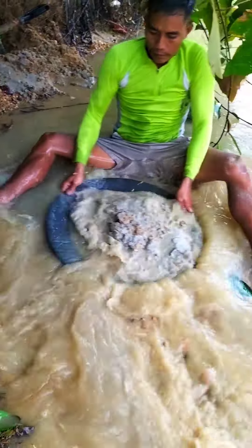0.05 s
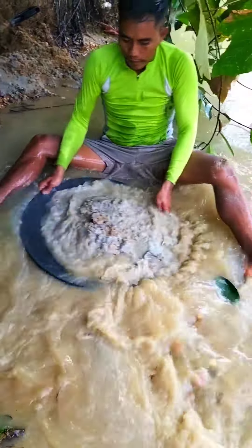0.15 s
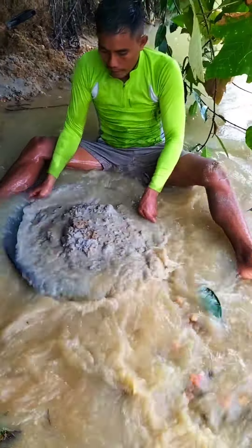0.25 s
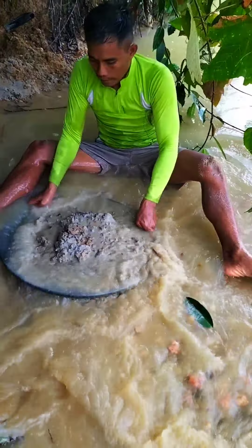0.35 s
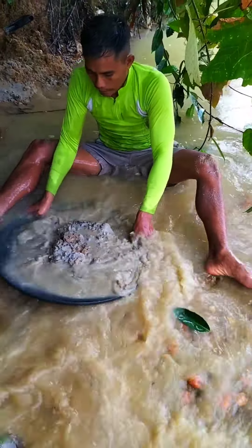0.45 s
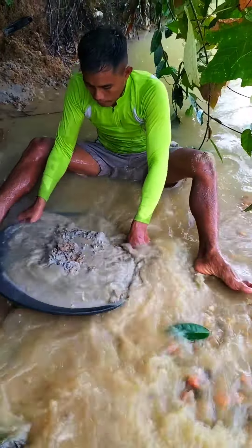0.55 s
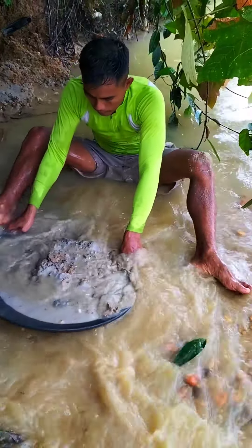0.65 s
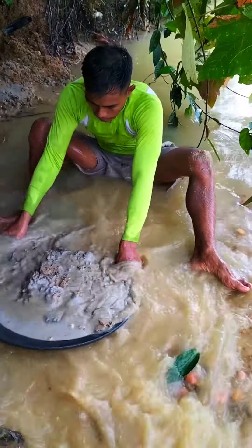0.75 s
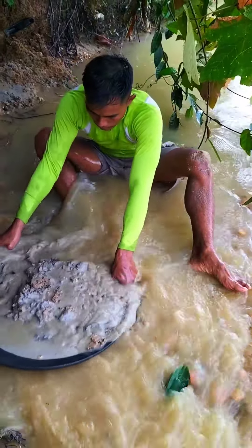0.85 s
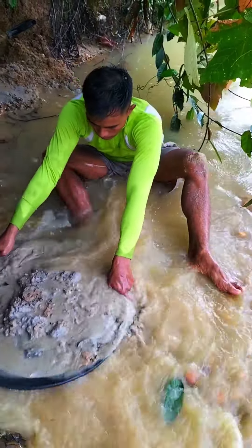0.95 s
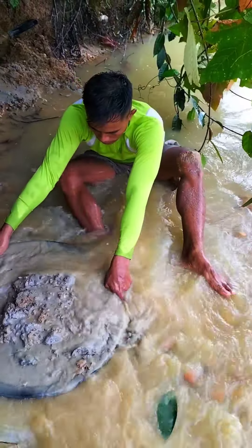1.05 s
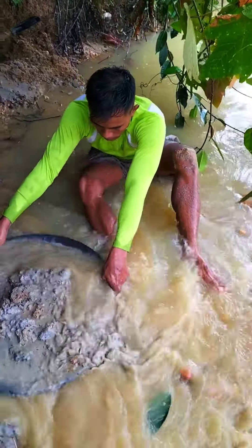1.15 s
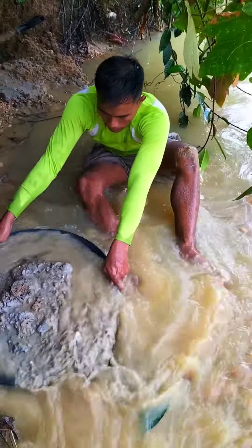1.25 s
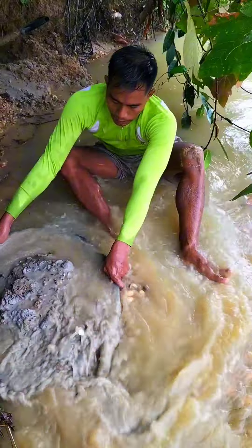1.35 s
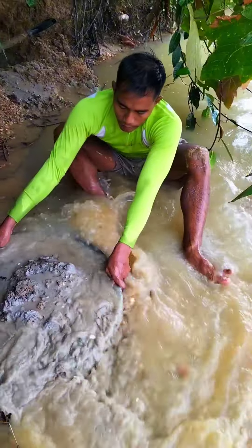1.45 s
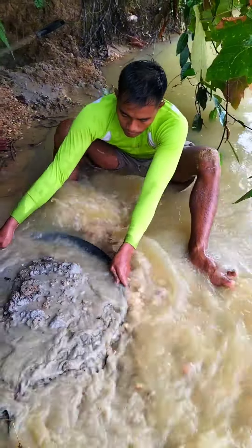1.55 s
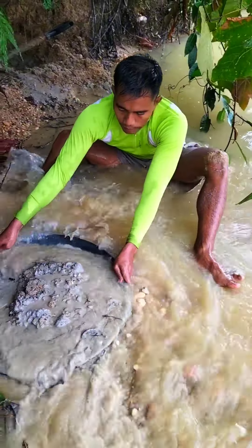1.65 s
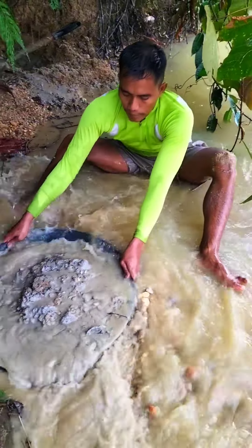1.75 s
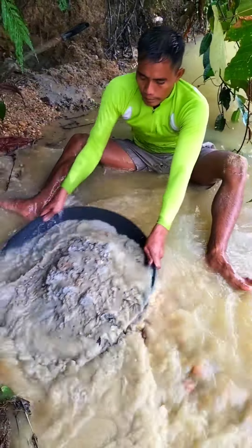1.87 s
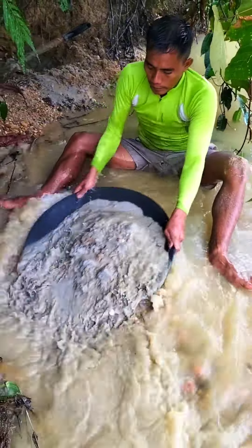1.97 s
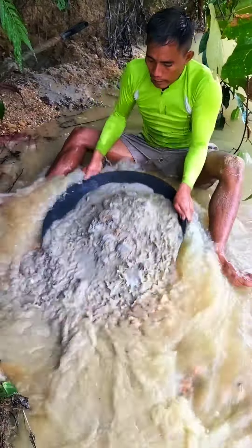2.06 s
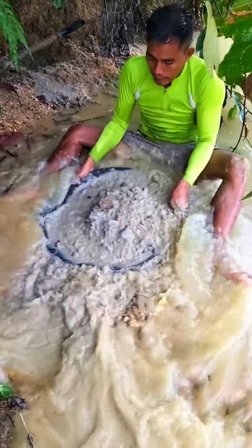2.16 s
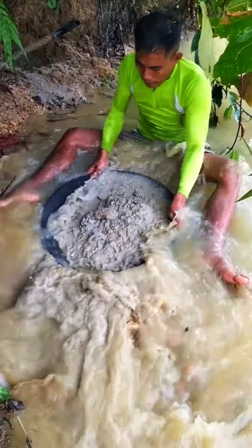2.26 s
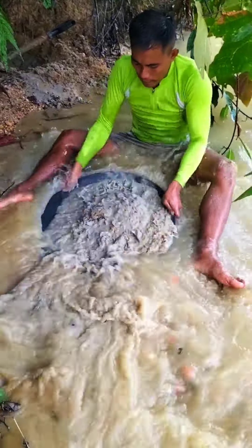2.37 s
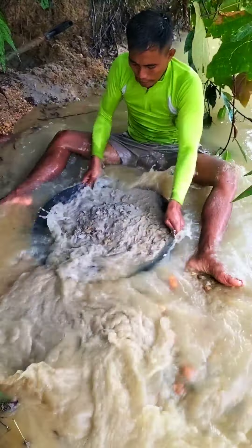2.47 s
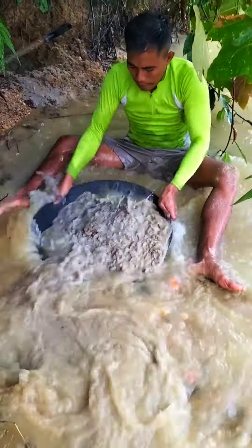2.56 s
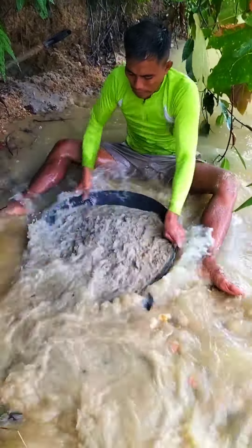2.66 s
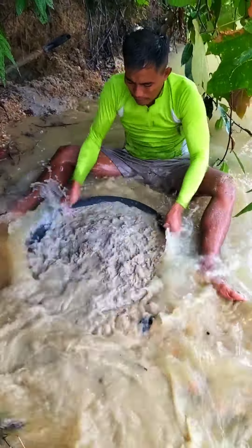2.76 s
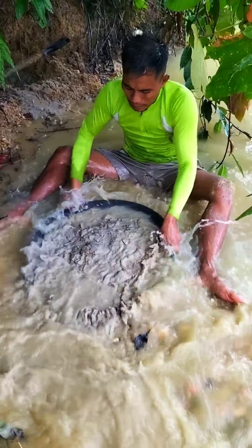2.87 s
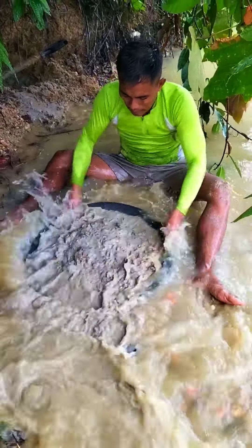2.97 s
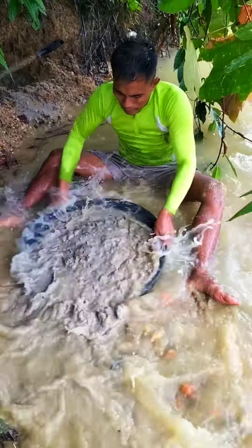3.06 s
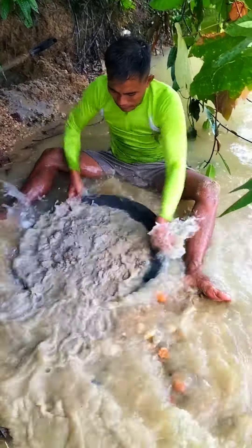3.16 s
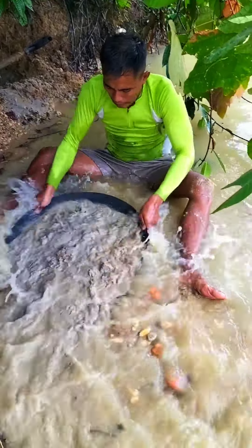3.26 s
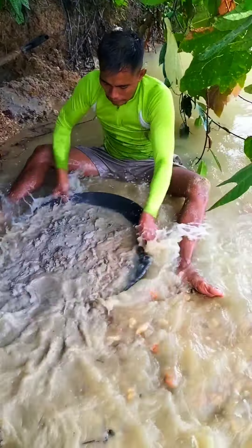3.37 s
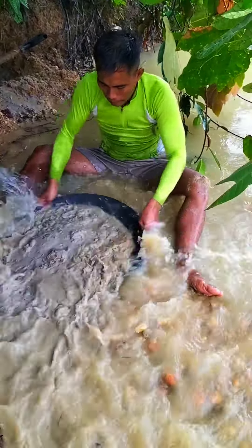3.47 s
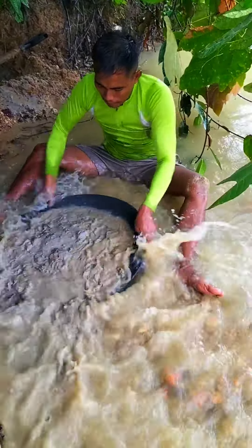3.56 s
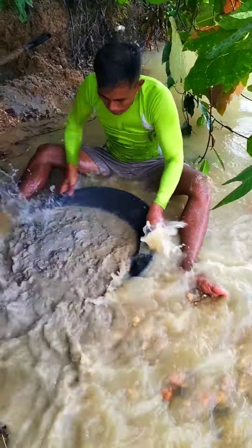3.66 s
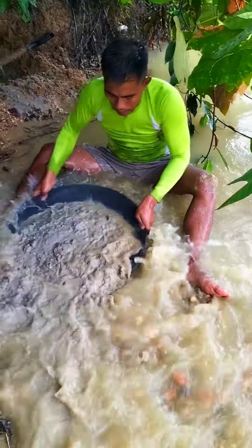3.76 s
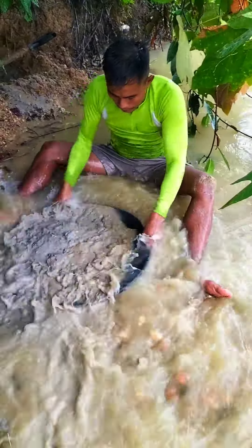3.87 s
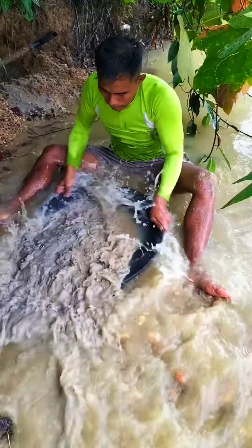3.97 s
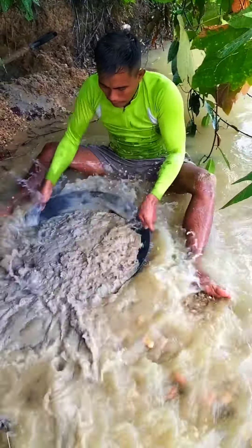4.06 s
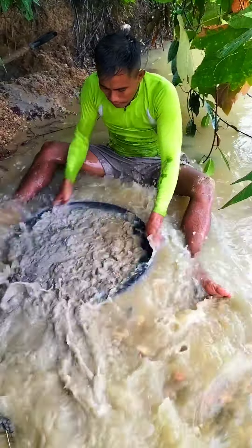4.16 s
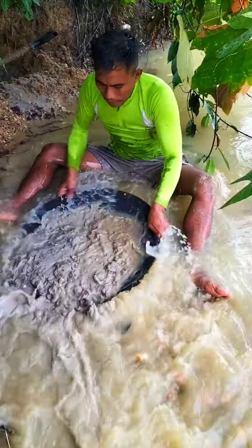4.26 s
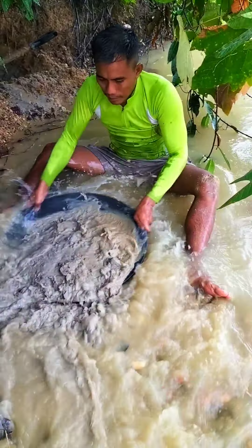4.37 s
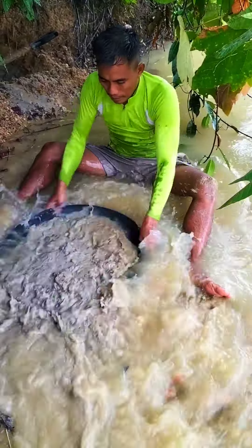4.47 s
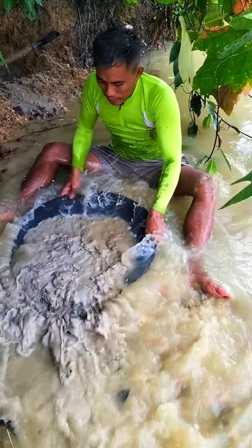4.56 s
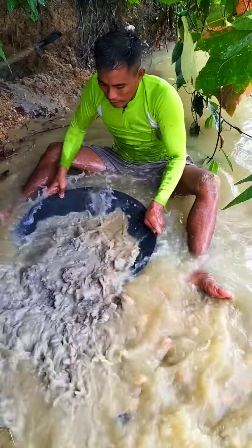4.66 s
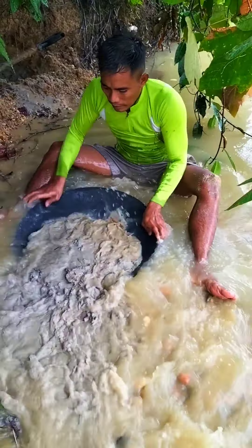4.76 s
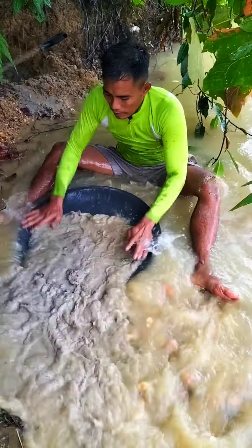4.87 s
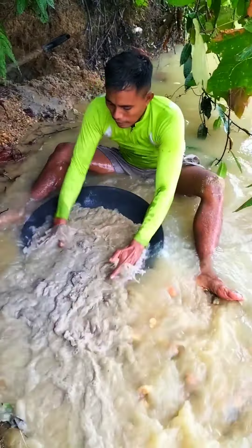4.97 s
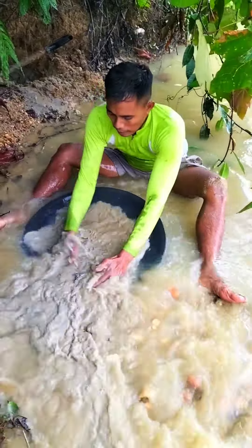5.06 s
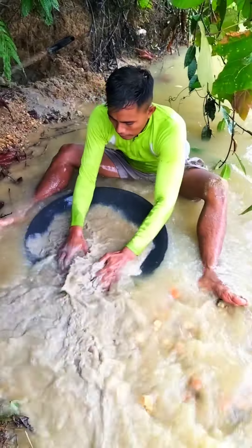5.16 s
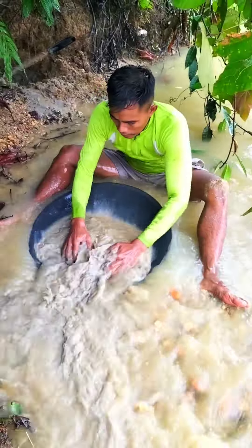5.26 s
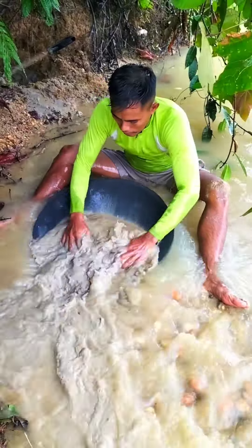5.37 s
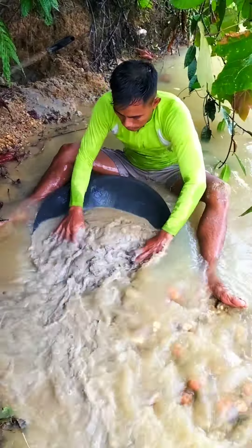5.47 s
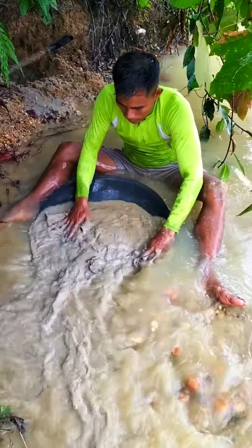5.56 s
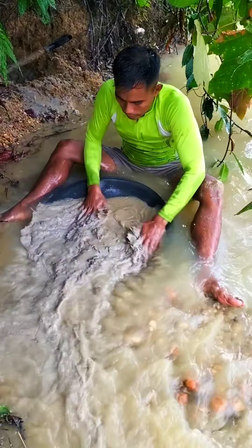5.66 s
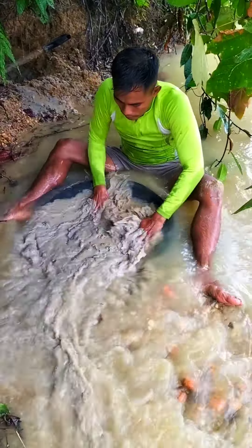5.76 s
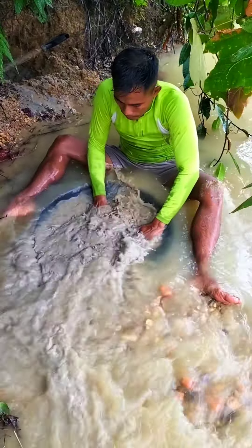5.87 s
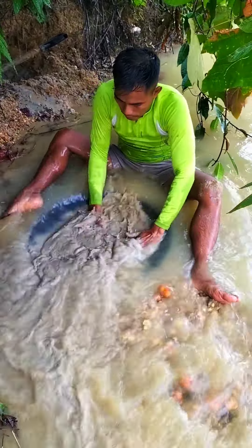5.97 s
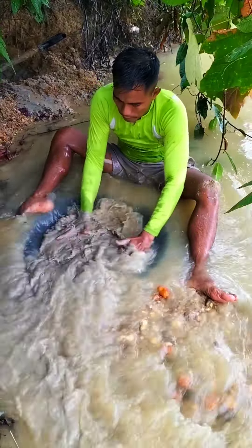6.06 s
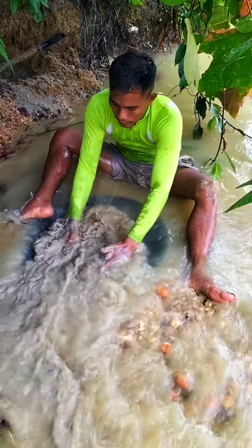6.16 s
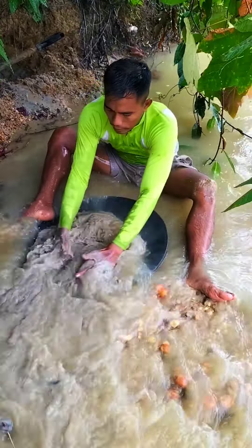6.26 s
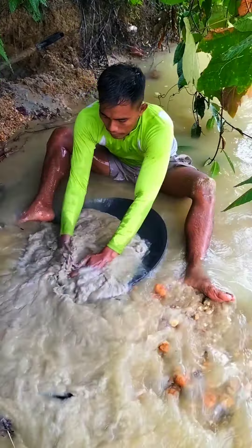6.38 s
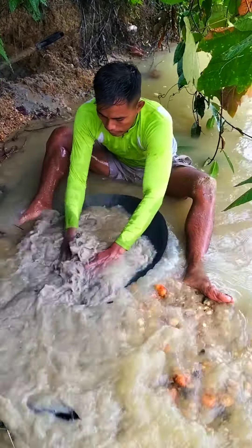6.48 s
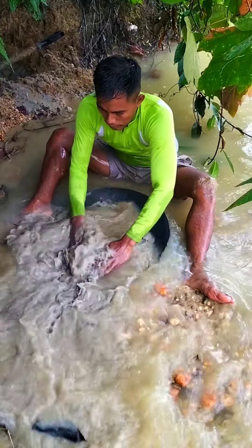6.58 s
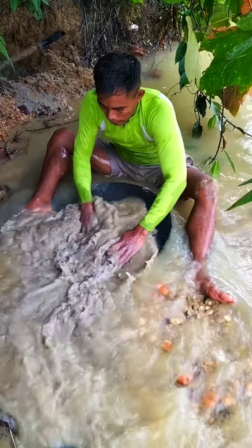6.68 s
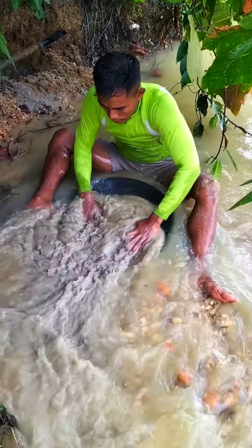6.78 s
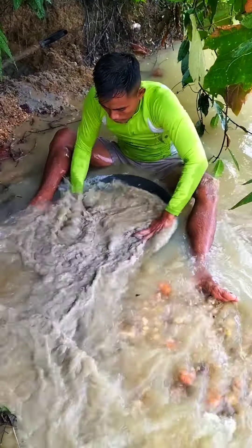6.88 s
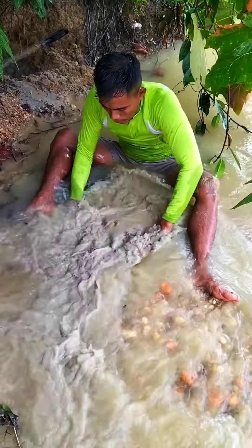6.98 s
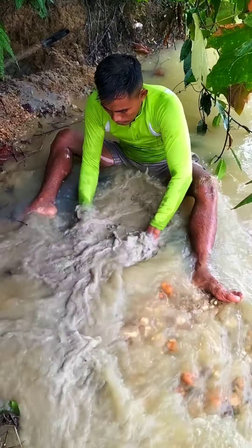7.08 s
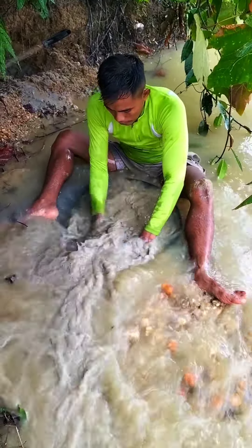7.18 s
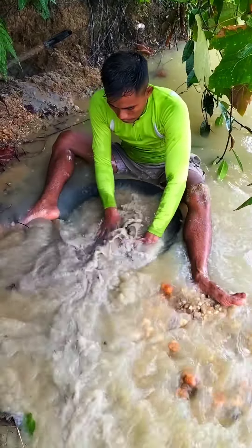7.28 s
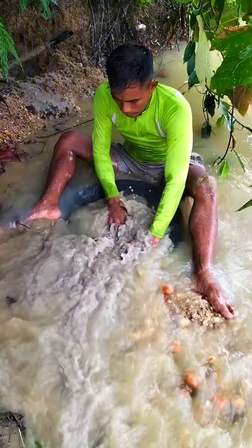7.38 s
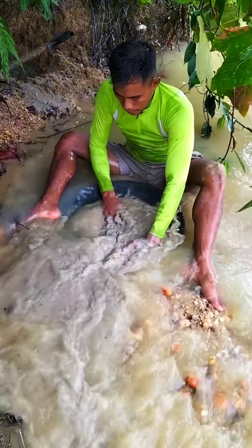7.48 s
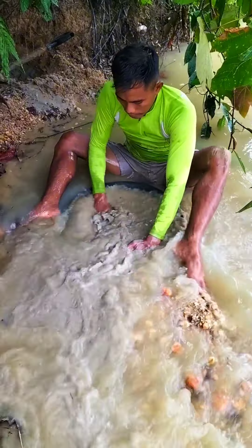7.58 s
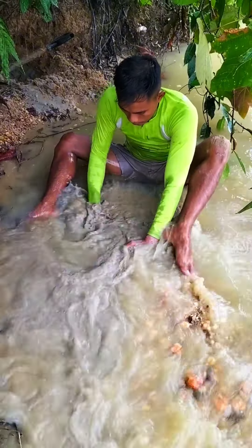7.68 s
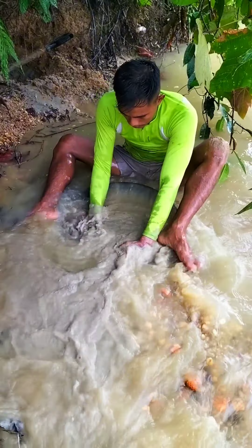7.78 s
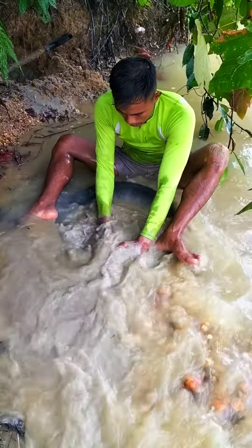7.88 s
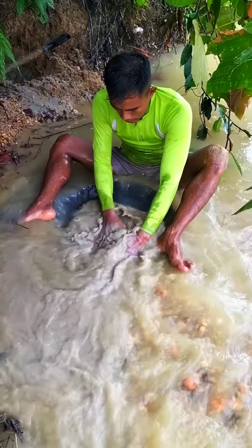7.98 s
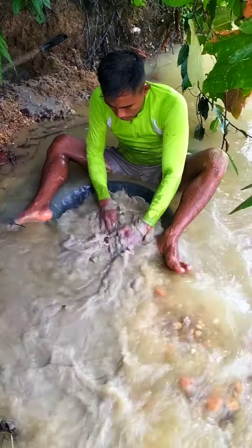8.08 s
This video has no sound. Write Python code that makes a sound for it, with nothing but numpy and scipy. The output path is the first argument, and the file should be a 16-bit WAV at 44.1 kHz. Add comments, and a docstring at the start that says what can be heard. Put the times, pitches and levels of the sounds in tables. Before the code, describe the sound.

Close beside a shallow stream, a pan of mud and gravel is swirled with soft, gritty sloshes while a bird gives six short rising whistles. Shaking then brings louder, dense splashes, slaps, bubbly plops and low gulps. Around five seconds it drops to quiet hand-kneading with raspy sand, scattered drips and small splashes. Faint babbling and thin insect hiss continue underneath.

```python
"""In a shallow stream, a wide pan of mud and gravel is swirled, shaken and then kneaded by hand.
Each surge of water sums decaying sine bubbles and filtered-noise froth; wet sand adds a bright noise rasp.
Single bubbles plop as lone resonators, slaps are noise bursts, and trapped gulps of air are gliding tones.
A bird gives six rising whistles at the start, and one thin chirp comes near the end, both as gliding sines.
The stream babbles with its own bubbles under a steady, thin insect hiss; banks add a diffuse noise tail."""
import sys
import numpy as np
from scipy import signal
from scipy.fft import rfft, irfft, next_fast_len
from scipy.io import wavfile
from scipy.ndimage import uniform_filter1d, map_coordinates

SR = 44100
rng = np.random.default_rng(int(sys.argv[2]) if len(sys.argv) > 2 else 0)


def store_pcm(level_fs):
    """Save levels as 16-bit WAV."""
    pcm = np.round(np.clip(level_fs, -1, 1) * 32767).astype(np.int16)
    wavfile.write(sys.argv[1], SR, np.atleast_2d(pcm).T)


N = 358533

# Spectra of large bubbles, small bubbles and spray. Each row: frequency in Hz, density in dB per Hz.
SLOSH_SPECTRUM = [(25, -26), (100, -21), (150, -8), (270, 0), (420, -2), (560, -14), (900, -45),
                  (2000, -90)]
SPLASH_SPECTRUM = [(150, -52.5), (350, -2.5), (520, -5.5), (730, 1), (900, -4), (1120, 1), (1400, -6),
                   (1700, -21), (2100, -12.5), (4000, -73)]
SPRAY_SPECTRUM = [(500, -74), (1200, -7.5), (1500, -9), (1800, -5), (2020, -16), (2250, 1), (2500, -1),
                  (3000, -9.5), (3550, -5), (4600, -13), (5200, -13.5), (5800, -8.5), (6400, -10.5),
                  (7100, -11)]
# Treble roll-off. Each row: frequency in Hz, gain in dB.
TREBLE_ROLLOFF = [(7100, -1), (7700, -9), (9300, -24), (11000, -21.5), (11850, -16.5), (12700, -22.5),
                  (15500, -29)]


def surges(heave, tumble, drops):
    """Superposition of resonators: the moving pan stirs up big bubbles, small bubbles and spray."""
    lapping = wobble(110)  # wavelets break in quick uneven bursts

    slosh = swarm(152.95, 644, life=3.25, spread_db=3.5, count=900, size=2400)
    slosh += amp(9.0) * froth(patchy_db=1.0, burst_db=15.0, fade=0.032, count=2000, size=3, frame=1024)
    slosh = colour(slosh * amp(1.3 * lapping), SLOSH_SPECTRUM)

    splash = swarm(470.0, 1954, life=4.7, spread_db=6.0, count=6000, size=900)
    splash += amp(6.0) * froth(patchy_db=7.5, burst_db=5.5, fade=0.0053, count=3000, size=4, frame=1024)
    splash = colour(splash * amp(1.2 * lapping), SPLASH_SPECTRUM)

    spray = swarm(1423, 7924, life=11, spread_db=5.0, count=6000, size=450)
    spray += amp(12.5) * froth(patchy_db=5.0, burst_db=4.0, fade=0.0055, count=5000, size=5, frame=512)
    spray = colour(spray * amp(1.4 * lapping), SPRAY_SPECTRUM, TREBLE_ROLLOFF)

    return (heave * even(slosh, window=0.055)
            + tumble * even(splash, window=0.067)
            + drops * even(spray, window=0.13))


# What the effort keeps going between surges, relative to the effort curve
CHURN_SLOSH_DB, CHURN_SPLASH_DB, CHURN_SPRAY_DB = -21, -8.5, -4
# The water heaves first, tumbles, and then breaks into drops
SLOSH_LEAD_S, SPRAY_LAG_S = 0.0016, 0.0096
# How hard the pan is worked: swirled, shaken from 1.5 s, kneaded from 4.8 s.
# Each row: time in seconds, churn in dB.
EFFORT = [(0.0, -21.5), (0.43, -27), (1.36, -28), (1.54, -23), (1.92, -21), (2.2, -16.5), (2.42, -25),
          (2.59, -21.5), (2.7, -17.5), (3.92, -16), (4.5, -18.5), (5.09, -28), (5.68, -30), (5.85, -27.5),
          (6.95, -27.5), (7.22, -31.5), (7.7, -28.5), (8.13, -33)]
# Waves that the pushes send over the rim. Each row: crest time in seconds, length in seconds,
# splash level in dB, slosh over splash in dB, spray over splash in dB.
SURGES = [(0.148, 0.22, -23.5, -23, 2.5), (0.295, .12, -26, -8.5, -7), (0.432, 0.15, -36.5, 4.5, 8.5),
          (0.586, 0.29, -25.5, -10, -6), (0.828, 0.53, -23, -4.5, -10), (0.908, 0.2, -32, 1, 9.5),
          (1.287, 0.3, -28.5, -16, 0.5), (1.5, 0.075, -22, -3, -1.5), (1.595, 0.28, -19, -4.5, -1),
          (1.713, 0.27, -19, -1.5, -0.5), (1.76, 0.054, -20, -11, 7.5), (1.993, 0.31, -21, -5, -6),
          (2.108, 0.18, -14.5, -32, -8.5), (2.262, 0.21, -16.5, -22, 1), (2.456, 0.25, -21, -18, 3),
          (2.638, 0.078, -23, -15, 6.5), (2.728, 0.17, -28, 5.5, 8.5), (2.898, 0.32, -21.5, -10, -1),
          (3.034, 0.26, -18.5, -10, -3.5), (3.177, 0.081, -18.5, -13, 0.5), (3.33, 0.078, -21, -10, -1.5),
          (3.402, 0.11, -17.5, -23, 1), (3.629, 0.052, -25.5, -0.5, 7), (3.716, 0.21, -16, -34, -9.5),
          (3.805, 0.092, -16, -6.5, -4.5), (4.009, 0.24, -19, -32, 1.5), (4.157, 0.24, -23.5, -28, 7.5),
          (4.31, 0.19, -23, -10, 7.5), (4.446, 0.095, -16, -11.5, -0.5), (4.643, 0.085, -20.5, -8, 3),
          (4.745, 0.18, -29.5, -2, 3.5), (4.89, 0.074, -25, -27, -4), (5.053, 0.065, -32, -12, 13),
          (5.43, 0.21, -28, -18, -9), (5.812, 0.24, -35.5, -25, 8.5), (6.31, 0.42, -38, -19, 8.5),
          (6.495, 0.12, -23.5, -20, 2.5), (6.665, 0.097, -25.5, -11, 1.5), (6.752, 0.17, -23.5, -9.5, 1),
          (6.986, 0.45, -28.5, -4, 0.5), (7.126, 0.032, -28, -12, 1), (7.58, 0.079, -21, -18, -2.5),
          (7.8, 0.42, -39, -26, 7.5), (7.984, 0.17, -33, -16, -8)]


def flow():
    """Addition of powers: surges join a steady churn that follows the effort; returns three gains."""
    churn_db = [[CHURN_SLOSH_DB], [CHURN_SPLASH_DB], [CHURN_SPRAY_DB]]
    heave, tumble, drops = (amp(churn_db) * level(EFFORT)) ** 2
    for crest, length, db, slosh_db, spray_db in SURGES:
        wave = swell(length)
        start = crest - length
        add(heave, start - SLOSH_LEAD_S, amp(db + slosh_db) ** 2 * wave)
        add(tumble, start, amp(db) ** 2 * wave)
        add(drops, start + SPRAY_LAG_S, amp(db + spray_db) ** 2 * wave)
    return np.sqrt([heave, tumble, drops])


RISE_SHARE, SWELL_POWER = 0.46, 1.42  # part of a surge's length before its crest; how round the crest is
SWELL_DROP_DB = 17  # a surge's start and end lie this far under its crest


def swell(length):
    """Asymmetric power envelope: a wave builds up and drains a little more slowly, crest in the middle."""
    u = np.linspace(-1, 1, int(2 * length * SR))  # runs beyond the start and end, to let the skirts fade
    side = np.where(u < 0, RISE_SHARE, 1 - RISE_SHARE)
    return amp(-SWELL_DROP_DB * np.abs(u / side) ** SWELL_POWER) ** 2


# Wet sand sliding round the pan, later raked by the hands.
# Each row: time in seconds, rasp over spray in dB.
RAKING = [(0.0, -10.5), (0.9, -10), (1.5, -27.5), (4.7, -12.5), (5.0, -4.5), (5.8, -9), (6.7, -10),
          (7.3, -10), (8.1, -11)]


def grit(drops):
    """Friction noise: each push also drags wet sand over the pan, a bright rasp that follows the spray."""
    rough = rng.standard_normal(N) * amp(5.2 * wobble(300))
    rasp = colour(rough, [(3500, -39), (5000, 2.0), (7000, 0.0)], TREBLE_ROLLOFF)
    return level(RAKING) * drops * unit(rasp)


# Water slapping the rim and hands. Each row: time in seconds, relative level in dB,
# relative level of the hollow body in dB, 60 dB decay time of the louder fade in seconds.
SLAPS = [(0.94, -5, -35, 0.015), (0.962, -6, -8, 0.02), (1.708, -8, 8, 0.068), (2, -9, -2, 0.093),
         (2.029, -5.5, -14, 0.011), (2.707, -15, -15, 0.04), (2.774, -9, -2, 0.068),
         (2.901, -7.5, 4, 0.044), (3.345, -6.5, -2.5, 0.039), (3.401, -11, 16, 0.03),
         (3.445, -10, 2, 0.025), (3.638, -10.5, -20, 0.046), (3.886, -5, -10, 0.027),
         (3.891, -9, 18, 0.031), (3.992, -13, 3, 0.12), (4.159, -12.5, 16, 0.051), (4.337, -10, -8, 0.06),
         (4.474, -5, -4, 0.013), (4.582, -9, -34, 0.18), (4.645, -9.5, 0.5, 0.096), (4.811, -15, -3, 0.071),
         (4.936, -15.5, -17, 0.03), (5.471, -18.5, -15, 0.016), (5.712, -28, -14, 0.4),
         (5.804, -20, -25, 0.07), (5.877, -18, -21, 0.056), (6.528, -16, -30, 0.047),
         (6.621, -17, -1, 0.022), (6.771, -14.5, -3, 0.029), (7.039, -10, -6.5, 0.059),
         (7.263, -20, -9.5, 0.15), (7.538, -12, -30, 0.069)]


def slaps():
    """Impact noise: a sheet of water bursts into spray over a hollow body; longer bursts start softer."""
    out, t = np.zeros(N), np.arange(SR // 4) / SR
    for s, db, body_db, t60 in SLAPS:
        bright, hollow = rng.standard_normal((2, len(t)))
        burst = unit(colour(bright, SPRAY_SPECTRUM, TREBLE_ROLLOFF))
        burst += amp(body_db - 0.5) * unit(colour(hollow, SPLASH_SPECTRUM))
        shape = amp(-60 * t / 0.04) + amp(10.5) * amp(-60 * t / t60)
        shape *= 1 - np.exp(-40 * t / t60)
        add(out, s + 0.0007, amp(db - 10.5) * even(burst, window=0.022) * shape)
    return out


# Single large bubbles and drops. Each row: start in seconds, relative level in dB, starting pitch in Hz.
PLOPS = [(0.18, -3, 3680), (0.356, -3, 3490), (0.421, -5.5, 5800), (0.559, -10, 1090), (1.045, -2.5, 3630),
         (1.323, -6, 1640), (1.529, -2, 1080), (1.747, -0.5, 2290), (1.774, -4, 2240), (2.381, -10, 646),
         (2.501, -11, 486), (2.774, -4.5, 1004), (2.869, 0.5, 2750), (2.949, 0.5, 735), (3.077, 2, 2400),
         (3.327, 3, 620), (3.527, -0.5, 3830), (3.549, 3.5, 804), (3.623, -9, 2390), (3.705, -1.5, 1086),
         (3.842, -1.5, 1125), (3.939, -9, 2440), (3.957, 4.5, 2390), (4.465, -2, 1060), (4.714, -10, 606),
         (4.732, -0.5, 3660), (5.05, -9.5, 2520), (5.144, -14.5, 756), (5.219, -20, 760),
         (5.266, -5.5, 2730), (5.325, -10.5, 3570), (5.414, -11, 1080), (5.518, -12, 1550),
         (5.588, -15.5, 710), (5.611, -11.5, 734), (5.806, -7.5, 1820), (5.994, -7, 1670),
         (6.671, -2.5, 5700), (6.753, -3.5, 4700), (7.039, -1, 2390), (7.346, -14.5, 825),
         (7.487, -13.5, 1290), (7.558, -0.5, 634), (7.588, -3.5, 2430), (7.688, -15.5, 4100),
         (7.721, -15, 750), (7.783, -8, 1600), (7.85, -8.5, 933), (7.992, -13, 2250), (8.026, -9.5, 2290)]


def plops():
    """Damped resonance: single bubbles pinch off with a tick and ring out above the wash."""
    out, t = np.zeros(N), np.arange(SR // 16) / SR
    for s, db, hz in PLOPS:
        life = 4.46 * (hz / 1000) ** 0.56  # in cycles: small bubbles ring for more of them
        wave = ring(hz * t, life, BUBBLE_RISE / 2, onset=0.88)
        tick = unit(colour(rng.standard_normal(len(t)), SPRAY_SPECTRUM, TREBLE_ROLLOFF))
        tick *= amp(-17) * amp(-60 * t / .018)
        add(out, s, amp(db - 4.0) * (wave / np.abs(wave).max() + tick))
    return out


# Air pockets under the rim. Each row: start in seconds, relative level in dB,
# mean start pitch in Hz, mean end pitch in Hz, length in seconds.
GULPS = [(1.48, -14, 211, 232, 0.014), (1.561, -13, 250, 205, 0.037), (1.605, -17, 185, 130, 0.13),
         (1.675, -10, 225, 280, 0.036), (1.724, -10, 283, 143, 0.023), (1.752, -16, 171, 135, 0.023),
         (1.93, -10.5, 282, 216, 0.013), (2.139, -9.5, 457, 367, 0.028), (2.169, -8.5, 260, 286, 0.027),
         (2.19, -17, 326, 500, .035), (2.705, -18.5, 181, 109, 0.051), (2.895, -11, 196, 280, 0.022),
         (2.935, -9, 265, 310, 0.022), (3.066, -7.5, 410, 216, 0.0077), (3.272, -9.5, 220, 390, 0.033),
         (3.445, -9.5, 265, 414, 0.019), (3.72, -10, 892, 660, 0.032), (3.775, -10.5, 288, 212, 0.02),
         (4.035, -10.5, 224, 261, 0.029), (4.086, -8, 280, 400, 0.03), (4.115, -17, 417, 572, .05),
         (4.297, -11.5, 213, 119, 0.071), (4.712, -11.5, 235, 290, 0.017), (4.738, -11, 243, 288, 0.014),
         (5.436, -29.5, 434, 520, 0.065), (6.087, -26.5, 270, 305, 0.081), (6.983, -15.5, 223, 250, 0.033),
         (7.449, -21.5, 527, 760, 0.027), (7.57, -19.5, 363, 414, 0.027), (7.611, -22, 437, 1000, .055),
         (7.926, -18, 430, 546, 0.02), (8, -19.5, 324, 383, 0.031)]


def gulps():
    """Cavity resonance: squeezed or opened air glides and wavers in pitch; strong, short gulps also thud."""
    out, waver = np.zeros(N), 1 + .06 * wobble(150)
    thud_spectrum = [(25, -15), (100, -16.0), (250, 11.5), (600, 6.5), (1500, -48)]
    for s, db, start_hz, end_hz, length in GULPS:
        u = np.linspace(0, 1, int(length * SR))
        hz = (start_hz + (end_hz - start_hz) * u) * waver[int(s * SR):][:len(u)]
        tone = np.sin(2 * np.pi * np.cumsum(hz) / SR)
        thud = unit(colour(rng.standard_normal(len(u)), thud_spectrum))
        thud *= amp(db) * .02 / length
        add(out, s, amp(db - 2.5) * np.sin(np.pi * u ** .7) * (tone + thud))
    return out * amp(2.2 * wobble(130))


WHISTLE_START_HZ, WHISTLE_ATTACK_S, WHISTLE_FADE_DB_PER_S = 1153, 0.015, 236
# Bird whistles. Each row: start in seconds, relative level in dB, mean top pitch in Hz,
# glide time constant in seconds, time from start to fade in seconds.
WHISTLES = [(-.012, -13, 1585, 0.029, 0.044), (0.271, -13.5, 1600, 0.025, 0.047),
            (0.556, -11.5, 1590, .019, 0.036), (0.825, -12.5, 1614, 0.024, 0.03),
            (1.077, -16.5, 1600, 0.026, 0.048), (1.342, -14, 1660, .037, 0.07)]
# Track of one thin chirp. Each row: time in seconds, relative level in dB, mean pitch in Hz.
CHIRP = [(7.43, -38, 4350), (7.475, -32, 4800), (7.5, -32, 4380), (7.52, -36, 4150), (7.55, -37, 4200)]


def bird():
    """Frequency modulation: rough whistles scoop up, level off and fade; then one faint, raspy chirp."""
    out, t = np.zeros(N), np.arange(SR // 5) / SR
    quaver = 1 + .014 * wobble(300)
    attack = np.sin(np.pi / 2 * np.minimum(t / WHISTLE_ATTACK_S, 1)) ** 2
    for s, db, top_hz, glide, held in WHISTLES:
        hz = top_hz + (WHISTLE_START_HZ - top_hz) * np.exp(-t / glide)
        hz *= np.roll(quaver, -int(s * SR))[:len(t)]
        fade = amp(db - WHISTLE_FADE_DB_PER_S * np.maximum(t - held, 0))
        add(out, s, attack * fade * np.sin(2 * np.pi * np.cumsum(hz) / SR))

    s, db, hz = np.transpose(CHIRP)  # a second, smaller bird
    t = np.arange(s[0], s[-1], 1 / SR)
    chirp_hz = np.interp(t, s, hz) * quaver[:len(t)] ** 2
    add(out, s[0], amp(np.interp(t, s, db)) * np.sin(2 * np.pi * np.cumsum(chirp_hz) / SR))
    return out * amp(2.8 * wobble(140))


# Spectrum of the babbling current. Each row: frequency in Hz, density in dB per Hz.
STREAM_SPECTRUM = [(25, -26), (60, 3.5), (220, 7.5), (480, -37), (750, 5), (950, -16), (1250, 12),
                   (2000, -21), (2400, -15), (3000, 5), (3600, 4.5), (4700, -12), (6800, -25), (9400, -23),
                   (11900, -4.5), (15500, -49)]


def stream():
    """Stationary bubble noise: the current babbles steadily; eddies release strings of round bubbles."""
    babble = swarm(410.6, 7310, life=2.2, spread_db=4.5, count=5000, size=600)
    babble += amp(-3.5) * froth(patchy_db=2.5, burst_db=4, fade=0.005, count=6000, size=3, frame=512)
    babble = colour(babble, STREAM_SPECTRUM)
    eddies = colour(swarm(480, 1700, life=5, spread_db=2, count=130, size=1500), SPLASH_SPECTRUM)
    return amp(-41.5) * unit(babble) + amp(-40) * unit(eddies)


def insects():
    """Band-limited noise: a steady, thin insect hiss, strongest near 6.8 kHz."""
    hiss_spectrum = [(4500, -59), (6200, -4), (6800, 2), (7300, -8.0), (8500, -42)]
    hiss = colour(rng.standard_normal(N), hiss_spectrum)
    return amp(-44.5) * unit(hiss)


def banks(x, t60):
    """Diffuse reverberation: earth banks and leaves answer with two noise tails in a wandering blend."""
    t = np.arange(SR // 2) / SR
    tails = rng.standard_normal((2, len(t))) * amp(-60 * t / t60) * (t > .006)
    a, b = (signal.fftconvolve(x, tail / np.linalg.norm(tail))[:N] for tail in tails)
    turn = np.pi * wobble(2)
    return np.cos(turn) * a + np.sin(turn) * b


# Pitch rise of a bubble over one life; largest pitch step along a string; mean spacing in a string
BUBBLE_RISE, STRING_STEP, STRING_GAP_CYCLES = .05, .09, 8


def ring(age, life, rise, onset):
    """Damped oscillation, times in cycles: a bubble swells, decays and sharpens as it nears the surface."""
    phase = 2 * np.pi * age * (1 + rise * age / life / 2)
    return np.sin(phase) * np.exp(-age / life) * (1 - np.exp(-age / onset))


def swarm(lo_hz, hi_hz, life, spread_db, count, size, per_string=4):
    """Random superposition: short strings of bubbles gurgle up or down, most small, a few large; rms 1."""
    strings = np.repeat(rng.random((count // per_string, 3)), per_string, axis=0)
    when, pitch, slope = strings.T[:, :, None]
    strength, damping, late = rng.random((len(when), 3)).T[:, :, None]
    place = np.arange(len(when))[:, None] % per_string
    n = np.arange(size)  # samples of one bubble
    first_hz = lo_hz * (hi_hz / lo_hz) ** pitch
    hz = first_hz * (1 + STRING_STEP * (2 * slope - 1)) ** place
    start = when * N + (place + late) * STRING_GAP_CYCLES * SR / first_hz
    gain = hz * amp(-spread_db * np.log(strength + 0.04))
    waves = ring(hz * n / SR, life * 2 ** (2 * damping - 1), BUBBLE_RISE, onset=0.71)
    waves *= gain * (1 - (n / size) ** 2)  # taper to zero
    return unit(np.bincount((start.astype(int) + n).ravel(), waves.ravel(), N)[:N])


def froth(patchy_db, burst_db, fade, count, size, frame):
    """Shot noise: tiny bursts merge into a hiss of sharp-edged clumps with patchy colour; rms 1."""
    z = signal.stft(rng.standard_normal(N), nperseg=frame)[2]
    field = uniform_filter1d(rng.standard_normal(z.shape), size, 0)  # smooth over frequency, then time
    field = uniform_filter1d(field, 2, 1)
    hiss = signal.istft(z * amp(patchy_db * unit(field)), nperseg=frame)[1][:N]
    when, strength = rng.random((count, 2)).T
    burst_power = amp(-burst_db * np.log(strength + 0.015)) ** 2
    clumps = np.bincount((when * N).astype(int), burst_power, N)
    power = signal.fftconvolve(clumps, np.exp(-np.arange(SR // 10) / SR / fade))[:N]
    return unit(hiss * np.sqrt(np.abs(power)))


def colour(x, *spectra):
    """Minimum-phase filtering: a causal filter with the summed (Hz, dB) spectra, by folding the cepstrum."""
    m = 2 * next_fast_len(len(x) // 2 + 2048)
    log_hz = np.log(np.fft.rfftfreq(m, 1 / SR) + 1)
    db = 0
    for spectrum in spectra:
        hz, gain_db = np.transpose(spectrum)
        db = db + np.interp(log_hz, np.log(hz), gain_db)
    cepstrum = irfft(np.log(amp(db)))
    cepstrum[1:m // 2] *= 2
    cepstrum[m // 2 + 1:] = 0
    return irfft(rfft(x, m) * np.exp(rfft(cepstrum)))[:len(x)]


def even(x, window):
    """Level normalization: hold the rms near 1 over each window of seconds, keeping the faster grain."""
    width = int(window * SR)
    power = uniform_filter1d(uniform_filter1d(x ** 2, width), width)
    return x / np.sqrt(np.abs(power) + 1e-6)


def wobble(rate):
    """Band-limited randomness: a smooth random curve with rate knots a second."""
    knots = rng.standard_normal(int(N * rate / SR) + 4)
    return map_coordinates(knots, [np.arange(N) * rate / SR])


def level(rows):
    """Envelope interpolation: a (seconds, dB) curve as one gain per sample."""
    return amp(np.interp(np.arange(N) / SR, *np.transpose(rows)))


def amp(db):
    """Logarithmic level: decibels to amplitude gain."""
    return 10 ** (np.asarray(db) / 20)


def unit(x):
    """Root-mean-square level: scale to rms 1."""
    return x / np.sqrt(np.mean(x ** 2) + 1e-20)


def add(out, s, x):
    """Linear superposition: mix x into out from s seconds on, cropping what falls outside."""
    i = round(s * SR)
    x = x[max(-i, 0):max(N - i, 0)]
    out[max(i, 0):max(i, 0) + len(x)] += x


def scene():
    """Direct and diffuse sound: water and bird calls with their tails, over the stream and insects."""
    heave, tumble, drops = flow()
    water = surges(heave, tumble, drops) + grit(drops) + slaps() + plops() + gulps()
    calls = bird()
    near_banks = amp(-11.5) * banks(water, t60=0.056)
    foliage = amp(-8) * banks(calls, t60=.2)
    return (water + near_banks + calls + foliage + stream() + insects())[None]


TOP_HZ = 15800  # band limit


def record(dry):
    """Saturation and band limiting: the loudest peaks are rounded off, and the top treble is removed."""
    rounded = dry / (1 + dry ** 6) ** (1 / 6)
    m = next_fast_len(N + SR // 2)
    kept = np.fft.rfftfreq(m, 1 / SR) < TOP_HZ
    return irfft(rfft(rounded, m) * kept, m)[:, :N]


dry = scene()
out = record(dry)
store_pcm(out)
```